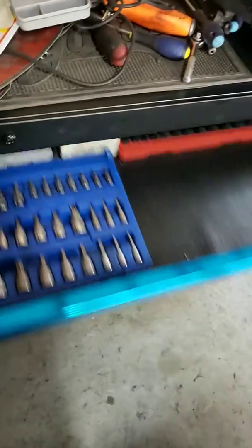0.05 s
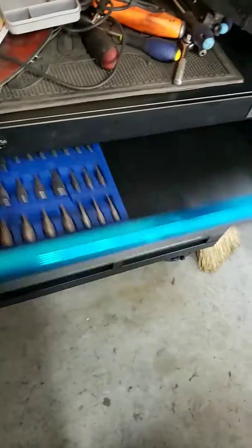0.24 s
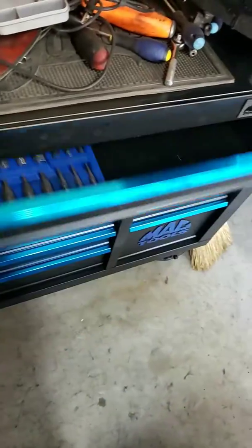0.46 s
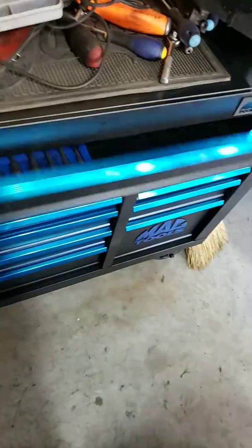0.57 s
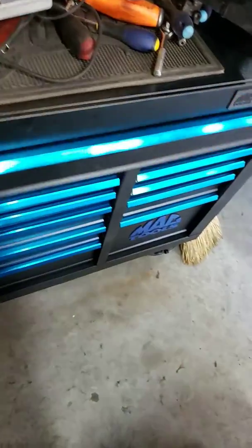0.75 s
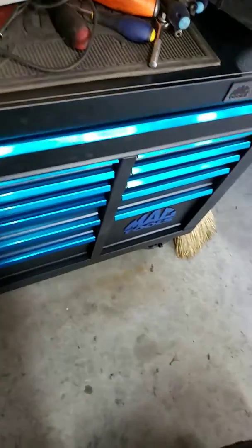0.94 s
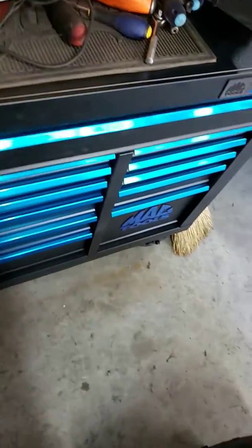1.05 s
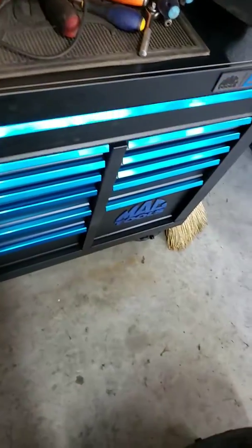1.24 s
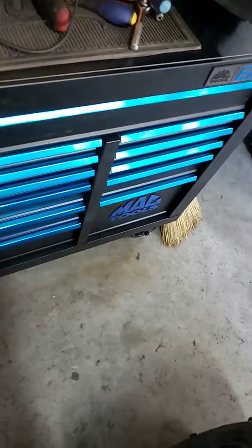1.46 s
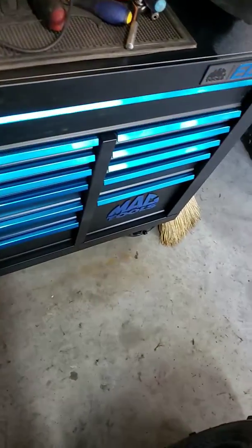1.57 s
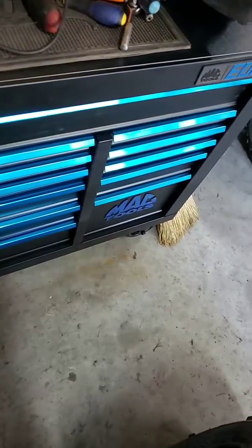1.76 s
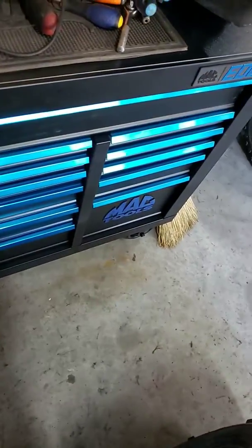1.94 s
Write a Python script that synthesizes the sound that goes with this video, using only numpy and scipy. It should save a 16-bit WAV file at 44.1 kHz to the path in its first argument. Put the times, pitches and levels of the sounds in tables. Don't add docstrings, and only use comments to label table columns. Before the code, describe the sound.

A metal tool chest drawer rolls shut, heard close in stereo. Soft ball-bearing rumble runs from the start, with light knocks at 0.12 and 0.2 seconds and a sharp tick near 0.43. Padded thumps and rattles cluster at 0.62-0.75, a firm latch knock at 0.86, then bright ratchet clicks and steel clinks until 1.1. A soft rub fades by 1.5, leaving faint workshop hum, hiss and a tiny late tick at 1.95.

```python
import sys
import numpy as np
from scipy import signal
from scipy.fft import rfft, irfft
from scipy.io import wavfile

SR = 44100
rng = np.random.default_rng(int(sys.argv[2]) if len(sys.argv) > 2 else 0)


def to_wav(s):
    ch = np.atleast_2d(s).T
    pcm = np.round(np.clip(ch, -1, 1) * 32767)
    wavfile.write(sys.argv[1], SR, pcm.astype(np.int16))


def voltage_ratio(level):
    return 10 ** (np.asarray(level, float) / 20)


N = 88420
T = np.arange(N) / SR
SIZE = 2 ** 17
HZ = np.fft.rfftfreq(SIZE, 1 / SR) + 1


def rms_one(x):
    return x / np.sqrt(np.mean(x ** 2) + 1e-20)


def at_hz(points, hz):
    table_hz, table_value = np.transpose(points)
    return np.interp(np.log(hz), np.log(table_hz), table_value)


def colour(x, db_at_hz):
    cepstrum = irfft(db_at_hz * np.log(10) / 20)
    cepstrum[1:SIZE // 2] *= 2
    cepstrum[SIZE // 2 + 1:] = 0
    response = np.exp(rfft(cepstrum))
    return irfft(rfft(x, SIZE) * response)[..., :N]


def filtered(x, order, hz, kind):
    return signal.sosfilt(signal.butter(order, hz, kind, fs=SR, output="sos"), x)


def grains(per_s, spread_db):
    size = voltage_ratio(spread_db * np.minimum(rng.exponential(1, (2, N)), 5))
    sign = rng.choice([-1, 1], (2, N))
    present = rng.random((2, N)) < per_s / SR
    return rms_one(size * sign * present)


def burst(s, hold_s, t60):
    return (T >= s) * voltage_ratio(-60 * np.clip(T - s - hold_s, 0, 9) / t60)


def ring(clicks, hz, t60):
    r = voltage_ratio(-60 / (t60 * SR))
    w = 2 * np.pi * hz / SR
    return signal.lfilter([0, np.sin(w)], [1, -2 * r * np.cos(w), r * r], clicks + 1e-18)


def body(x, modes, damping):
    return sum(voltage_ratio(db) * ring(x, hz, np.clip(t60 * damping, .01, 1.2)) for hz, db, t60 in modes)


def struck(hits, modes, scatter_db):
    s, db = np.transpose(hits)
    at = (s * SR).astype(int)
    out = 0
    for hz, mode_db, t60 in modes:
        strength, side = rng.standard_normal((2, len(s)))
        clicks = np.zeros((2, N))
        clicks[:, at] = voltage_ratio(db + mode_db + scatter_db * strength) * [np.ones(len(s)), side]
        out = out + ring(clicks, hz, t60)
    return out


# time in seconds, level in dB.
ROLL = [(0.0, -61), (0.15, -55), (0.28, -57), (0.68, -54), (0.87, -56), (1.02, -58), (1.09, -60),
        (1.21, -66.5), (1.6, -85), (1.85, -83), (2.0, -73)]
# frequency in Hz, level in dB per Hz.
ROLL_COLOUR = [(35, -38), (60, 6.5), (450, -3.5), (700, -6), (1500, -12.5), (3850, -16.5), (7000, -18.5),
               (16000, -24)]
# time in seconds, treble in dB.
ROLL_TREBLE = [(0.0, 3.5), (0.1, -1), (0.3, -3), (0.39, -6), (0.48, -1), (1.2, 0.5), (1.4, -5)]
# frequency in Hz, level in dB, t60 in seconds.
RAILS = [(474, -6, 0.074), (591, -3, 0.106), (705, -10, 0.046)]


def rolling():
    clicks = grains(per_s=2500, spread_db=1.5)
    balls = rms_one(colour(clicks, at_hz(ROLL_COLOUR, HZ)))
    treble = signal.lfilter(*signal.butter(1, 2200, "high", fs=SR), balls)
    balls = balls + (voltage_ratio(np.interp(T, *np.transpose(ROLL_TREBLE))) - 1) * treble
    rail_db, rail_s, rail_span_s = -64.5, 0.41, 0.094
    free_run = np.exp(-((T - rail_s) / rail_span_s) ** 2)
    rails = voltage_ratio(rail_db) * free_run * rms_one(body(clicks, RAILS, damping=1))
    gain_db = 2.5
    return voltage_ratio(np.interp(T, *np.transpose(ROLL)) + gain_db) * balls + rails


# start in seconds, level in dB, t60 in seconds, brightness in dB per octave, rise in seconds.
KNOCKS = [(0.119, -37, 0.095, 0, .001), (0.123, -43.5, 0.43, 1, .002), (0.2058, -38, 0.19, 0, 0.0014),
          (0.501, -48, 0.17, 7, .004), (0.62, -43, 0.38, 0, .004), (0.637, -43.5, 0.14, 9, .002),
          (0.652, -38.5, 0.2, 0, .006), (0.691, -40.5, 0.063, 6.5, .001), (0.7495, -41.5, 0.11, 5.5, .0007),
          (0.853, -42, 0.1, 1, .001), (1.008, -44.5, 0.17, -1.5, .004)]
# frequency in Hz, level in dB per Hz.
KNOCK_COLOUR = [(90, -22), (150, 0), (280, -4), (720, 2.5), (1040, -2), (1700, -1), (3220, -7), (7000, -19),
                (16000, -25)]
# frequency in Hz, level in dB, t60 in seconds.
PAN = [(459, -7.5, 0.13), (744, -3.5, 0.034), (931, -7.5, 0.11), (1250, -22, 0.14), (1370, -5, 0.057),
       (1610, -3, 0.04), (2127, -5.5, 0.027), (3400, -5, 0.041)]


def knocks():
    hold_s, pan_db = 0.0034, -37
    contacts = grains(per_s=4000, spread_db=1.5)
    out = 0
    for s, db, t60, tilt_db, rise_s in KNOCKS:
        shape_db = at_hz(KNOCK_COLOUR, HZ) + tilt_db * np.log2(np.clip(HZ, 500, 7000) / 1500)
        shape_db -= 10 * np.log10(np.mean(voltage_ratio(2 * shape_db)))
        rise = 1 - np.exp(-np.abs(T - s) / rise_s)
        rattle = contacts * burst(s, hold_s, t60) * rise
        out = out + voltage_ratio(db) * colour(rattle, shape_db)
    return out + voltage_ratio(pan_db) * body(out, PAN, damping=0.55)


# start in seconds, level in dB.
THUMPS = [
    (0.2, -50.5),
    (0.5, -55.5),
    (0.648, -38),
    (0.662, -39.5),
    (0.68, -37),
    (0.715, -47.5),
    (0.745, -39.5),
    (0.81, -46.5),
    (0.88, -51),
]
# frequency in Hz, level in dB, t60 in seconds.
CABINET = [(59.2, -1.5, 0.17), (111, -5.5, 0.082), (147, 0.5, 0.23), (201, -1, 0.04), (314, 4, 0.048),
           (390, -1.5, 0.17)]


def thumps():
    return filtered(struck(THUMPS, CABINET, scatter_db=1.0), 2, 344, "low")


# start in seconds, level in dB.
LATCH_HITS = [
    (0.856, -37.5),
    (0.865, -30),
    (0.887, -40.5),
]
# frequency in Hz, level in dB, t60 in seconds.
LATCH = [(430, -3, 0.11), (395.7, -3, 0.079), (715.7, -9.5, 0.11), (950, -13, 0.036), (2290, -6.5, 0.015)]


def latch():
    return struck(LATCH_HITS, LATCH, scatter_db=0.5)


# start in seconds, level in dB, brightness in dB per octave.
RATCHET = [(0.922, -31.5, -8), (0.933, -30, 5), (0.9424, -26, -1.5), (0.9560, -27, 5), (0.9625, -28, -4),
           (0.975, -33, -16), (0.9872, -26, 10), (1.013, -38.5, 10), (1.0167, -29.5, 4), (1.0243, -43, 8.5),
           (1.03, -42, -1), (1.1072, -42, 4), (1.115, -45, 5)]
# frequency in Hz, level in dB, t60 in seconds.
DAMPER = [(3990, -15.5, 0.031), (4220, -14, 0.026), (4860, -3, 0.013), (5200, -17, 0.0051),
          (5880, -4, .008), (6530, -18.5, 0.016), (6980, -13.5, 0.016)]
DAMPER_BAND_HZ = [2060, 11800]


def ratchet():
    scrape_s, tooth_t60_s, gain_db = .0015, .03, -27.5
    scrape = grains(per_s=15000, spread_db=3.2)
    out = 0
    for hz, mode_db, t60 in DAMPER:
        octaves = np.log2(hz / 5000)
        drive = sum(voltage_ratio(db + tilt_db * octaves) * burst(s, scrape_s, tooth_t60_s)
                    for s, db, tilt_db in RATCHET)
        out = out + voltage_ratio(mode_db) * ring(scrape * drive, hz, 0.86 * t60)
    return voltage_ratio(gain_db) * filtered(out, 2, DAMPER_BAND_HZ, "band")


# time in seconds, level in dB.
GLIDE = [
    (0.999, 9),
    (1.078, 4.5),
    (1.25, -3.5),
    (1.421, -20.5),
    (1.47, -21.5),
    (1.6, -63),
]
# frequency in Hz, level in dB, t60 in seconds.
PANELS = [(430, 2.5, 0.018), (840, 1, 0.01), (1403, 0, 0.021), (1670, 5, 0.014), (2310, -1, 0.018),
          (2560, 1, .011), (2865, 2, 0.017)]


def glide():
    panel_db, panel_top_hz = -87, 3300
    rubbing = grains(per_s=6000, spread_db=0.76)
    panels = filtered(body(rubbing, PANELS, damping=1), 4, panel_top_hz, "low")
    return voltage_ratio(panel_db + np.interp(T, *np.transpose(GLIDE), left=-90)) * panels


CLINK_S = [.661, .691, .757, .7535, .753, .916, .920, .925, .937, 1.045, .999, .9345, .948, .992, .935, .94,
           .93, .7035]
BIT_HZ = [9744, 12899, 10337, 14080, 11170, 11540, 12794, 13798, 15192, 13798, 15192, 13798, 13798, 13798,
          12420, 13590, 14340, 12899]
# level in dB, t60 in seconds, beat in Hz, rise in seconds.
CLINKS = [(-45, 0.28, 5.7, 0.0062), (-33.5, 0.089, 25, 0.00042), (-46.5, 0.4, 14, 0.0167),
          (-40.5, 0.068, 40, .001), (-38, 0.04, 36, 0.00059), (-46, 0.17, 15, 0.0016),
          (-38, 0.45, 2.4, .003), (-44, 0.1, 14, 0.002), (-30.5, .4, 8.3, .02), (-41.5, 0.33, 1.1, 0.054),
          (-28.5, 0.25, 3, 0.081), (-39, .12, 11, .0015), (-29.5, .09, 31, .002), (-41, 0.22, 11, .015),
          (-50, 0.13, 20, .01), (-48, .15, 20, .01), (-51, .12, 20, .01), (-39.5, 0.27, 20, 0.0048)]


def clinks():
    restrike_s, pair_share = .005, 0.26
    phases = rng.uniform(0, 2 * np.pi, (len(CLINKS), 2))
    out = 0
    for s, (db, t60, beat_hz, rise_s), hz, (a, b) in zip(CLINK_S, CLINKS, BIT_HZ, phases):
        age = np.clip(T - s, 0, 9)
        first = np.sin(2 * np.pi * hz * age + [[0], [a]])
        second = np.sin(2 * np.pi * (hz + beat_hz) * age + [[0], [b]])
        pair = first + pair_share * second
        touches = [later for later, other in zip(CLINK_S, BIT_HZ) if other == hz and later > s]
        restruck = min(touches + [9])
        pair *= np.clip((restruck - T) / restrike_s, 0, 1)
        out = out + voltage_ratio(db - 60 * age / t60) * (1 - np.exp(-age / rise_s)) * pair
    return out


SNAP_S = [.1212, .1245, .1262, .1266, .1335, .1415, .2078, .2092, .2125, .2180, .2205, .4292, .4293, .4294,
          .4294, .6915, .7522, .7525, 1.0175, 1.9518, 1.9519, 1.9520, 1.9522, 1.9519, 1.9518, 1.014, 1.019,
          .6235, .6255]
# level in dB, pitch in Hz, t60 in seconds.
SNAPS = [(-39, 1250, 0.045), (-42.5, 1900, 0.044), (-37, 3300, 0.027), (-29.5, 670, 0.057),
         (-33.5, 1200, 0.031), (-31.5, 720, 0.044), (-36.5, 2900, 0.017), (-29.5, 1750, 0.028),
         (-41.5, 725, 0.13), (-36, 1600, 0.036), (-46, 3000, .03), (-25.5, 10000, 0.0028),
         (-30, 11600, 0.0014), (-26, 13400, 0.0028), (-23, 18000, 0.0028), (-45, 5850, .02),
         (-33.5, 3014, 0.024), (-36.5, 6300, 0.0074), (-39, 5900, 0.037), (-42, 18000, 0.0033),
         (-35.5, 6500, 0.0039), (-56.5, 4200, .008), (-59.5, 3040, 0.017), (-38, 8400, .003),
         (-61, 14500, 0.0027), (-43, 460, 0.12), (-44, 680, 0.13), (-40.5, 1330, 0.074),
         (-38.5, 2070, 0.045)]


def snaps():
    out = np.zeros(N + SR)
    age = T[:SR // 4]
    for s, (db, hz, t60) in zip(SNAP_S, SNAPS):
        i = int(s * SR)
        rise = 1 - np.exp(-age * hz / 1.4)
        out[i:i + len(age)] += voltage_ratio(db - 60 * age / t60) * rise * np.sin(2 * np.pi * hz * age)
    return out[:N] * np.array([[1], [.6]])


# start in seconds, level in dB, centre in Hz, width as a share, t60 in seconds.
TICKS = [(0.085, -49, 12400, 1, 0.15), (0.117, -44, 12000, 1, 0.11), (0.488, -52.5, 9450, .9, 0.045),
         (0.691, -38.5, 6100, 0.29, 0.013), (0.7535, -36.5, 5400, 0.18, 0.017),
         (0.507, -59, 4270, 0.08, 0.27), (1.412, -79.5, 6300, 0.22, 0.16), (1.584, -69, 2150, 0.46, 0.3),
         (1.585, -79, 5850, 0.25, 0.47), (1.823, -83.5, 6170, 0.16, 0.48), (1.904, -79.5, 6300, 0.18, 1),
         (1.93, -76, 740, 0.27, 0.28)]


def ticks():
    white = rng.standard_normal((2, N))
    out = 0
    for s, db, hz, width, t60 in TICKS:
        band = [hz / (1 + width / 2), hz * (1 + width / 2)]
        out = out + voltage_ratio(db) * rms_one(filtered(white, 2, band, "band")) * burst(s, 0, t60)
    return out


# frequency in Hz, t60 in seconds.
ROOM = [(100, 0.61), (500, 0.47), (2000, 0.54), (6000, 0.29), (15000, 0.1)]


def room(x):
    white = rng.standard_normal((2, N))
    edges = 60 * 2 ** np.arange(9.0)
    tail = 0
    for low, high in zip(edges, edges[1:]):
        t60 = at_hz(ROOM, np.sqrt(low * high))
        decay = voltage_ratio(-60 * T / t60) * np.clip(T / 0.005, 0, 1)
        band = filtered(white, 2, [low, high], "band")
        tail = tail + band * decay * np.sqrt(np.log(1e6) / t60 / SR)
    return signal.fftconvolve(x[None], tail, axes=1)[:, :N]


# frequency in Hz, level in dB per Hz.
HUM = [(15, -38.5), (36, 2), (86, 0), (217, -22), (253, -17.5), (334, -22.5), (757, -35), (1000, -38),
       (1300, -72), (2200, -120)]
# frequency in Hz, level in dB per Hz.
HISS = [(600, -22.5), (1000, -4), (1500, -3), (4000, -9.5), (6000, -10.5), (9000, 0.5), (16000, 0)]


def hum_and_hiss():
    hum, hiss = rng.standard_normal((2, 2, N))
    hum = voltage_ratio(-60.5) * rms_one(colour(hum, at_hz(HUM, HZ)))
    hiss = voltage_ratio(-79.5) * rms_one(colour(hiss, at_hz(HISS, HZ)))
    return hum + hiss


# frequency in Hz, left minus right in dB.
LEAN = [(60, 3), (150, 3), (300, 0.5), (600, -2.4), (1200, 0), (4400, 5.5), (8000, 2), (13000, -3.5)]
# frequency in Hz, side minus mid in dB.
WIDTH = [(40, -23), (150, -23.5), (300, -22.5), (600, -4), (1200, -0.9), (4000, 0.2), (15000, -0.6)]


def microphone_pair(mid, side):
    side = colour(side, at_hz(WIDTH, HZ))
    lean_db = at_hz(LEAN, HZ) / 2
    return np.array([colour(mid + side, lean_db), colour(mid - side, -lean_db)])


def scene():
    room_db, clink_wet_db, tick_wet_db = -6, -20, -3
    hits = knocks() + ratchet() + glide() + latch() + thumps()
    rings = clinks()
    taps = ticks() + snaps()
    to_room = hits + voltage_ratio(clink_wet_db) * rings + voltage_ratio(tick_wet_db) * taps
    wet = voltage_ratio(room_db) * room(to_room[0])
    mid, side = rolling() + hits + rings + taps + wet + hum_and_hiss()
    return microphone_pair(mid, side)


def band_limit(x):
    return signal.sosfilt(signal.butter(12, 16630, fs=SR, output="sos"), x)


# frequency in Hz, level in dB.
MIC = [(4000, -1.71), (6300, -1), (7500, -4.5), (8500, -14.5), (10500, -9.5), (13000, -3.5), (15200, -6),
       (15900, -8)]


def record(dry):
    heard = filtered(colour(dry, at_hz(MIC, HZ)), 2, 23, "high")
    top_cut = signal.cheby2(10, 50, 16600, fs=SR, output="sos")
    mix = signal.sosfilt(top_cut, heard)
    return band_limit(mix)


dry = scene()
out = record(dry)
to_wav(out)
```